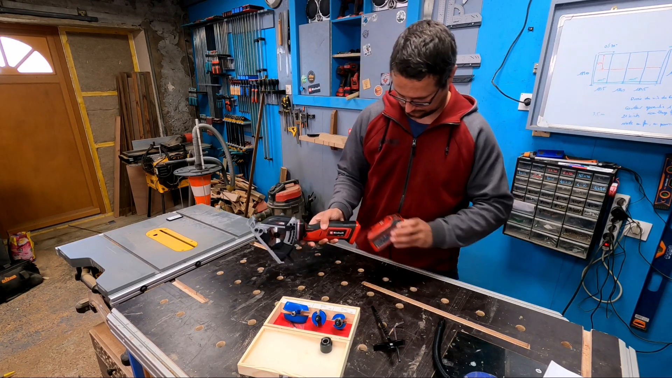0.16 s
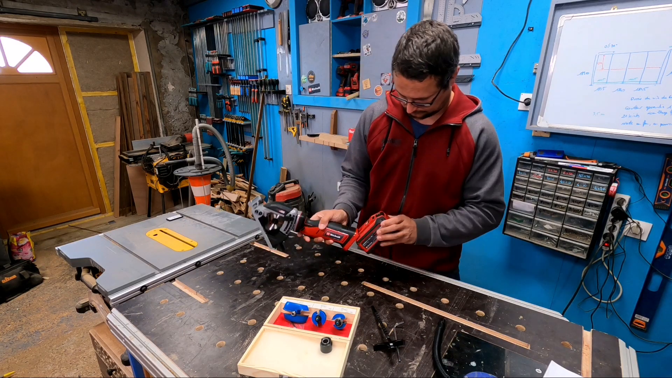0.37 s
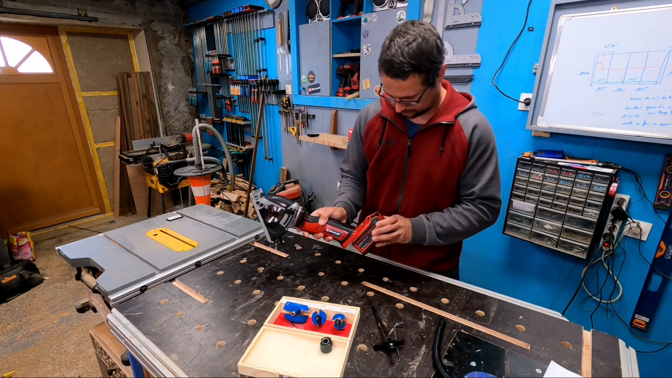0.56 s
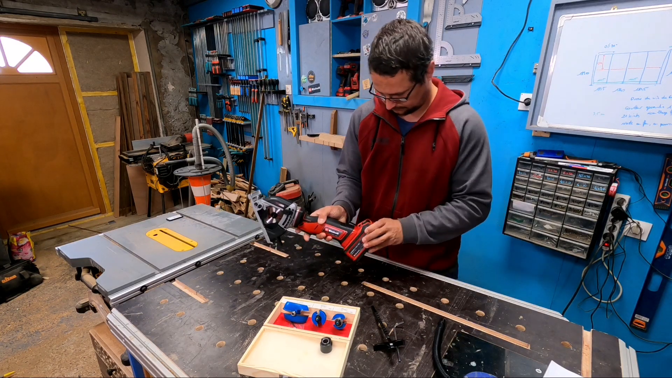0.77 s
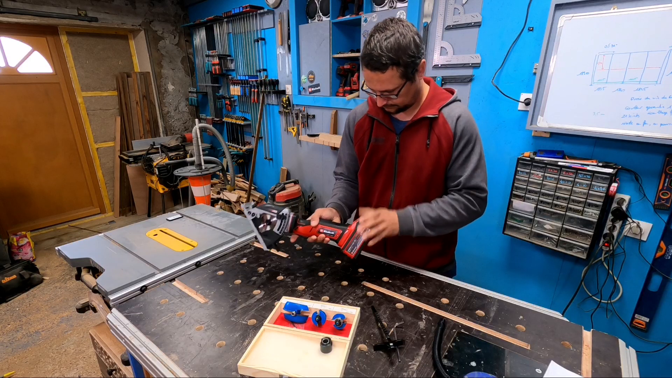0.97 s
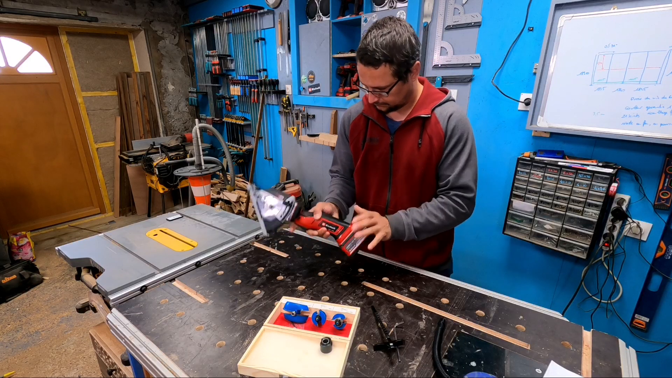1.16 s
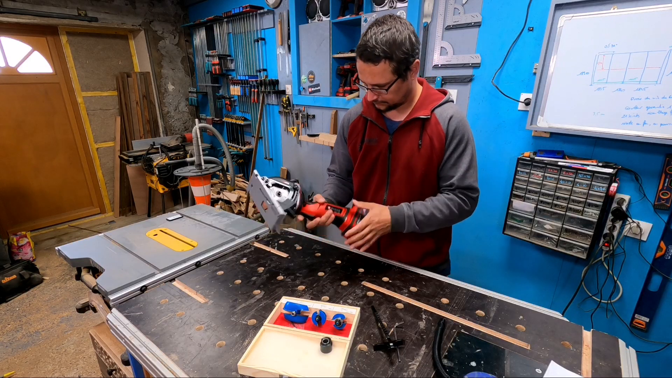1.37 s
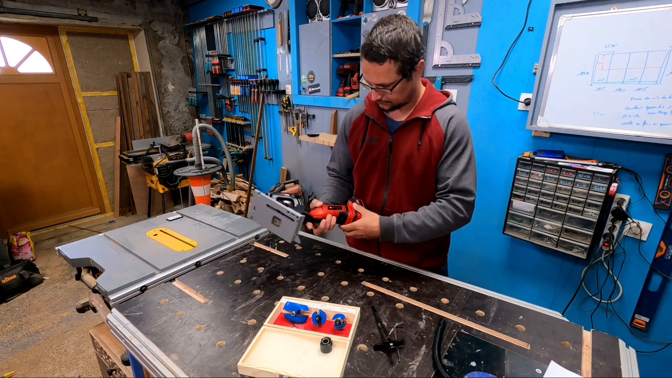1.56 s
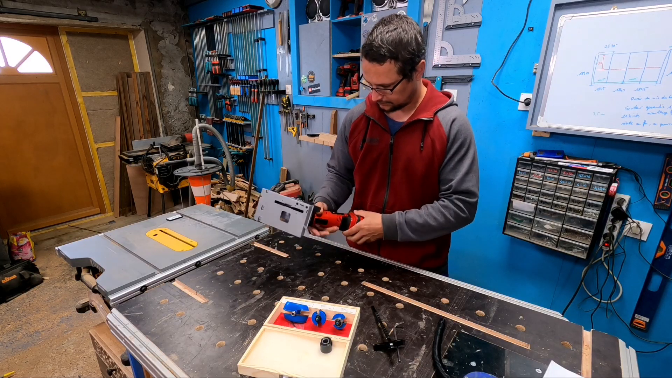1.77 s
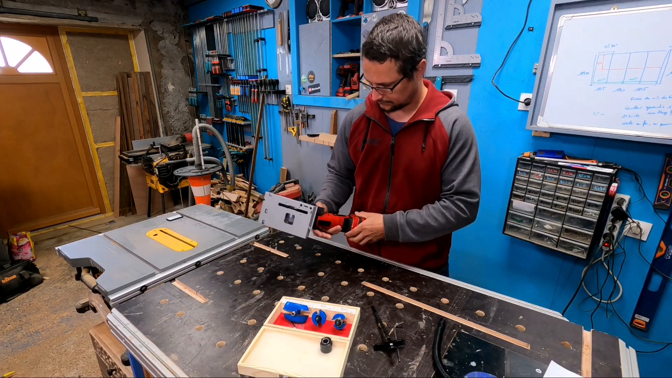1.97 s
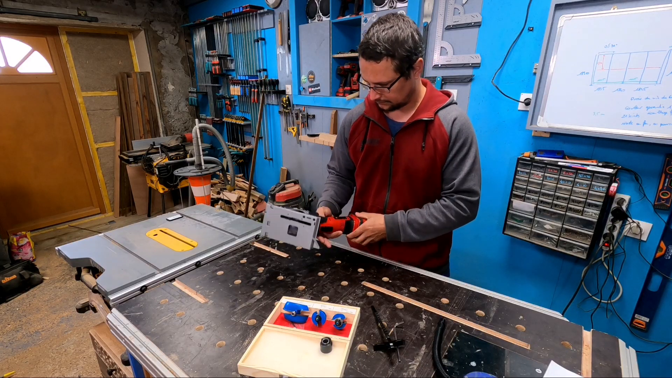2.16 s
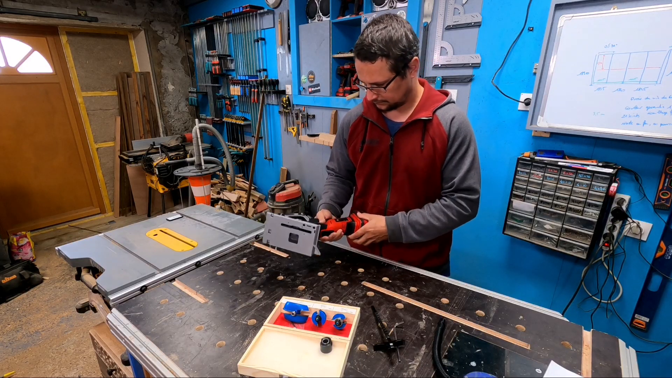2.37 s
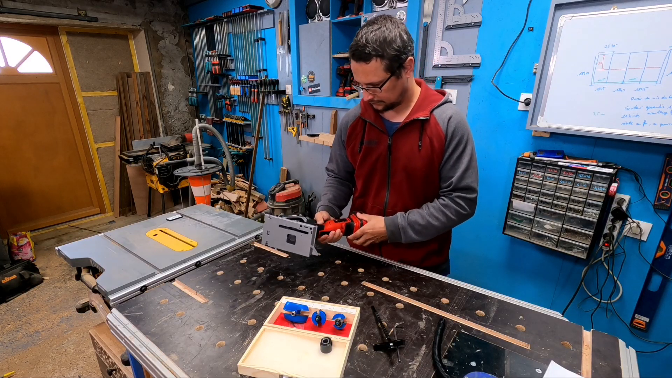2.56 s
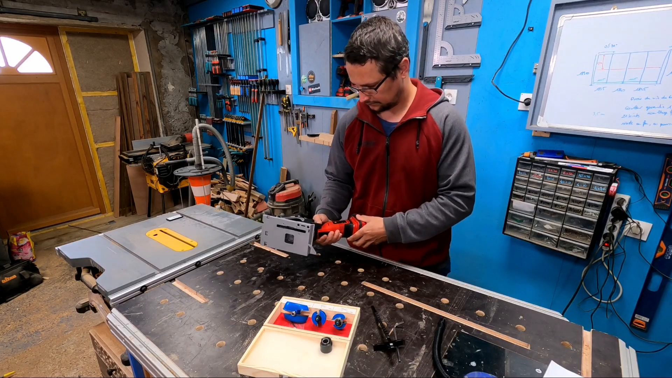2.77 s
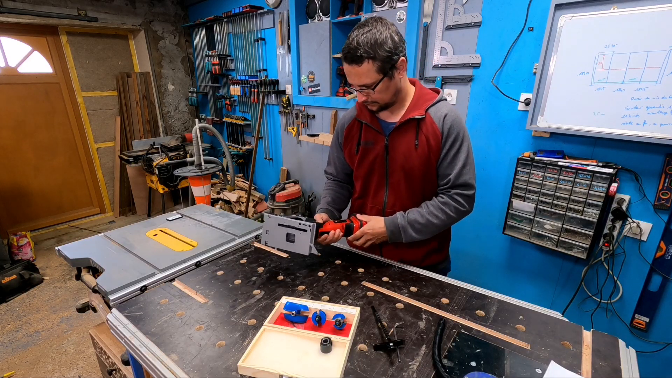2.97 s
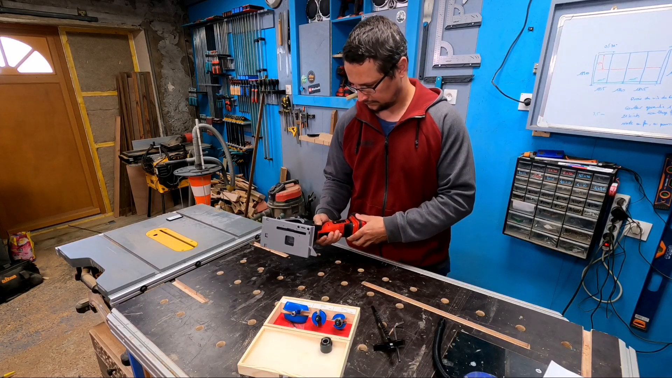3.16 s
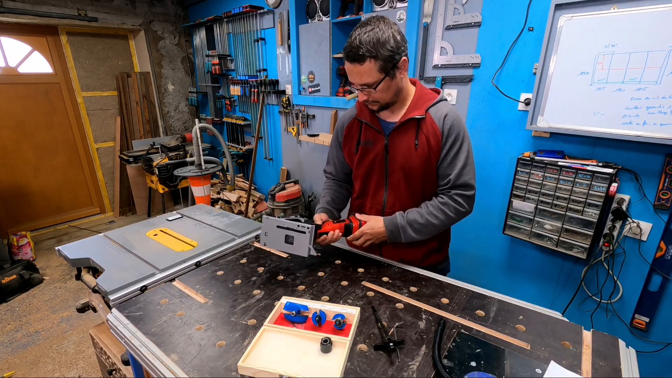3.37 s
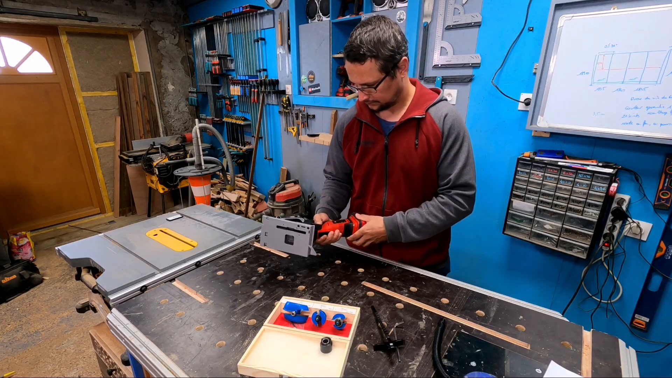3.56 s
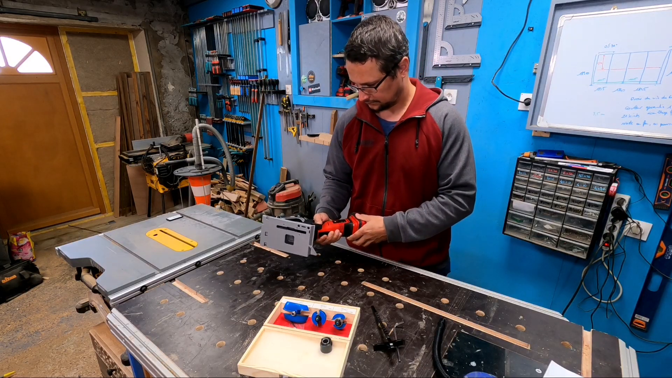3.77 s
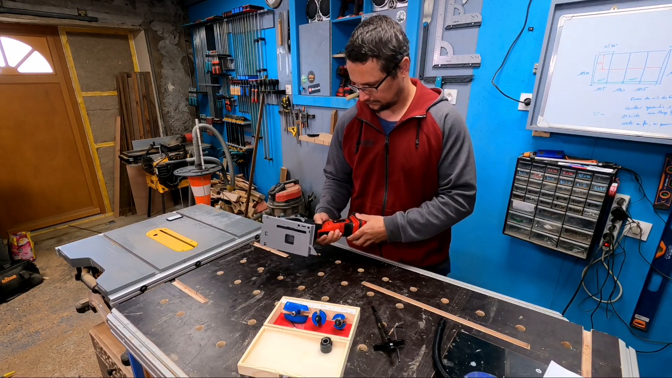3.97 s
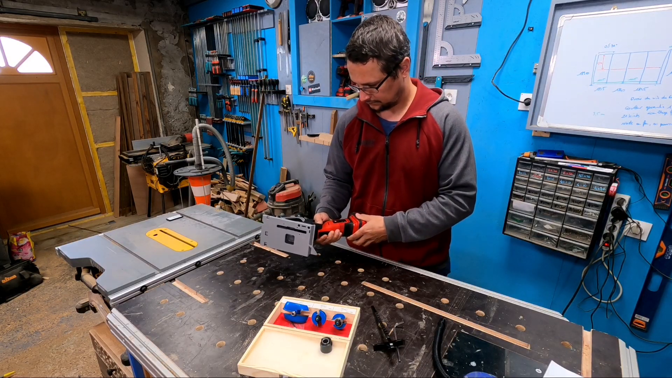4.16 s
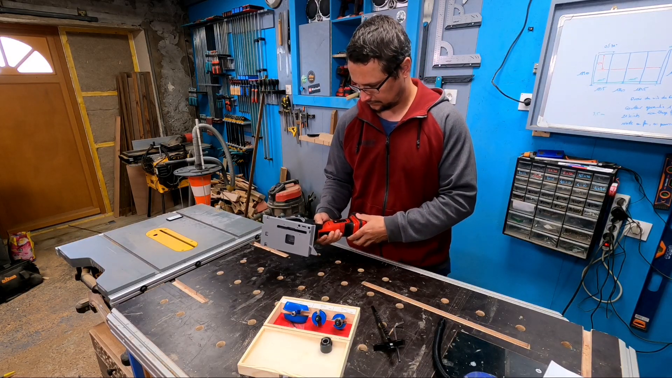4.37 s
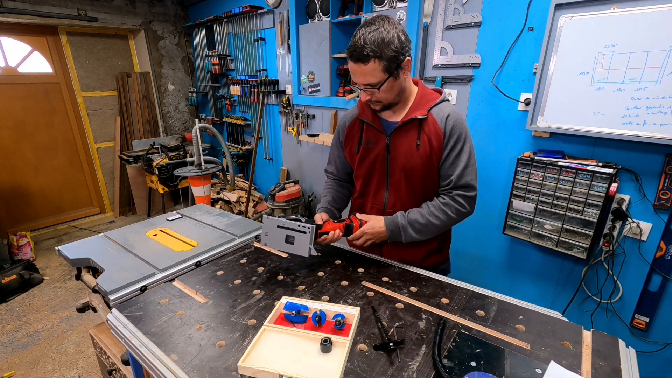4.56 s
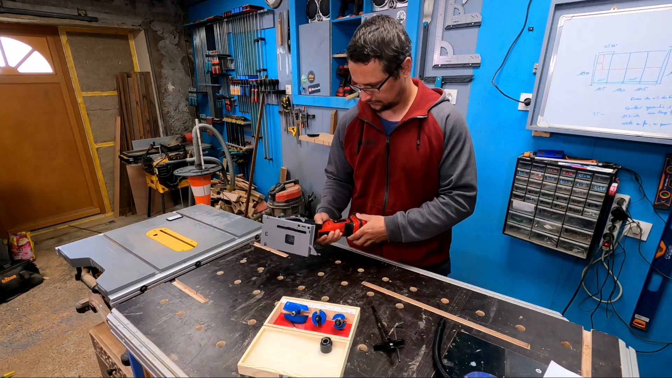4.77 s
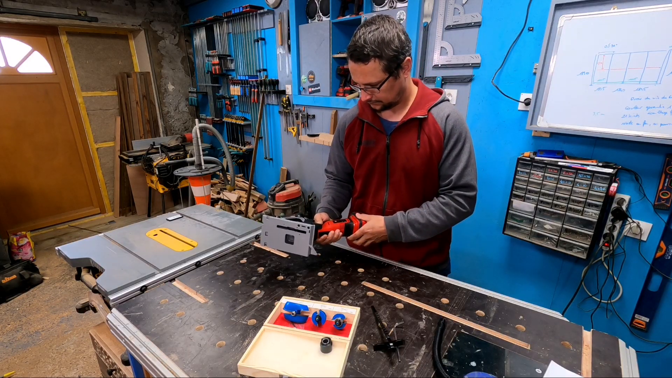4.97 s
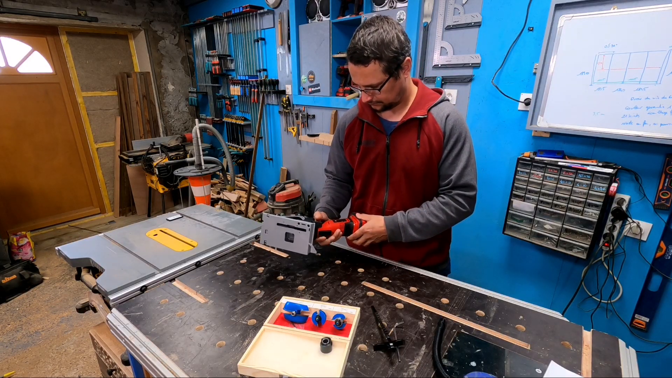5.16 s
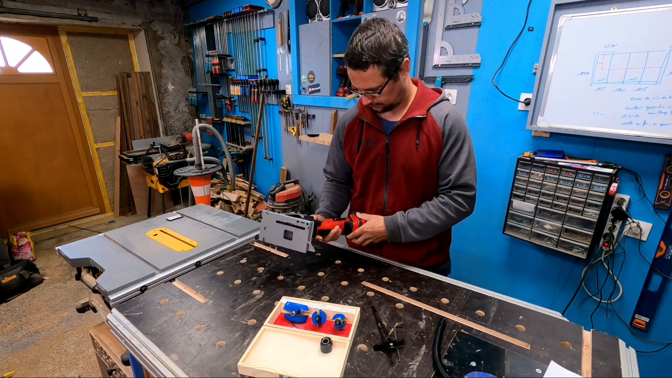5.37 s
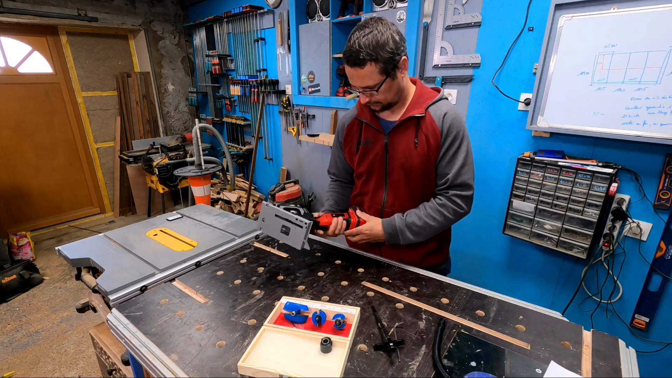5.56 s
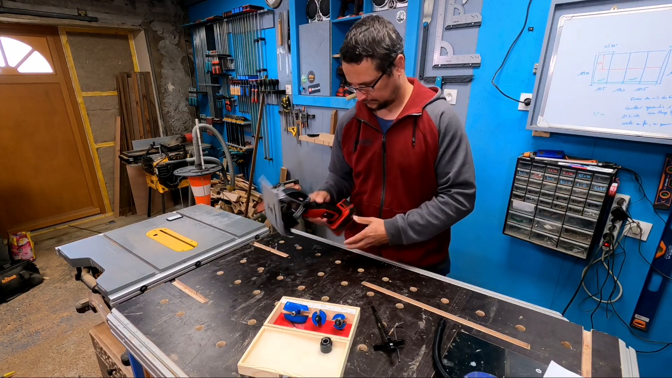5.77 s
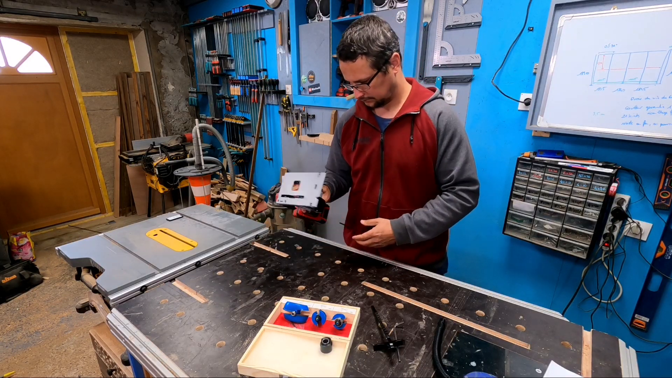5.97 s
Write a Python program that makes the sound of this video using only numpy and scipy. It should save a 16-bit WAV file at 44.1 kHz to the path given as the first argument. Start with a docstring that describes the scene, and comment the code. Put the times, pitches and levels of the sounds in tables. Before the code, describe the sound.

Close, dry plastic clicks of a battery being seated come first, ending in a loud bright latch clack with a brief rustling tail. After near silence with light cloth rustle and soft thumps, a small power tool knocks into motion, climbs in pitch for two seconds, holds a hissing, whining top speed briefly, then drops rapidly and chatters to rest. The small workshop answers with short reflections.

```python
"""In a small workshop, a battery is slid and latched onto a cordless trim router and the switch is clicked.
The brushless motor ramps up, holds its top speed and is braked: shaped noise gives fan rush and bearing rattle,
sines locked to the shaft give its tones, and cracks with a metal ring give the knocks of the slow rotor.
Plastic clicks are noise cracks with ringing shell modes; filtered, grainy noise gives rustle and a latch's tail.
Low bumps and soft thumps are short sines, over a quiet noise floor; bench and walls answer with decaying noise."""
import sys
import numpy as np
from scipy import signal
from scipy.fft import rfft, irfft, next_fast_len
from scipy.io import wavfile
from scipy.ndimage import map_coordinates

SR = 44100
rng = np.random.default_rng(int(sys.argv[2]) if len(sys.argv) > 2 else 0)


def file_out(sig):
    """Save sig as 16-bit WAV at sys.argv[1]."""
    # one column per channel
    cols = np.atleast_2d(sig).T
    # limit, then scale
    lim = np.clip(cols, -1, 1)
    pcm = np.round(lim * 32767).astype(np.int16)
    wavfile.write(sys.argv[1], SR, pcm)


N = 265834
TIME = np.arange(N) / SR
TOP_HZ = 14700  # upper band limit of the whole sound


def amp(db):
    """Decibels to gain."""
    return 10 ** (np.asarray(db) / 20)


def unit(x):
    """Scale to rms 1."""
    return x / np.sqrt(np.mean(x ** 2) + 1e-20)


def along(points, hz):
    """Read (f/Hz, value) points on a log frequency axis."""
    f, v = np.transpose(points)
    return np.interp(np.log(hz + 1), np.log(f + 1), v)


def wobble(rate):
    """A smooth random curve with rate knots a second."""
    knots = rng.standard_normal(int(N * rate / SR) + 4)
    return map_coordinates(knots, [TIME * rate])


def filtered(x, response):
    """Filter x by a response given as a function of frequency."""
    m = next_fast_len(N + SR // 2)
    return irfft(rfft(x, m) * response(np.fft.rfftfreq(m, 1 / SR)), m)[..., :N]


def coloured(x, spectrum):
    """Shape x with a (f/Hz, level/dB) spectrum, at rms 1."""
    return unit(filtered(x, lambda hz: amp(along(spectrum, hz))))


def causal(gain, size=4096):
    """Minimum-phase impulse response of energy 1: a sharp front with the given gain over frequency."""
    cepstrum = irfft(np.log(np.maximum(gain(np.fft.rfftfreq(size, 1 / SR)), 1e-6)))
    cepstrum[1:size // 2] *= 2
    cepstrum[size // 2 + 1:] = 0
    h = irfft(np.exp(rfft(cepstrum)))
    return h / np.linalg.norm(h)


def add(track, s, sound):
    """Mix a sound into the track at time s."""
    part = track[max(round(s * SR), 0):][:len(sound)]
    part += sound[:len(part)]


# speeds in turns per second
START_S, RAMP_HZ_PER_S, TOP_SPEED_HZ = 2.585, 191, 378.4
CREEP_HZ_PER_S, SETTLE_HZ = 4.4, 5  # the governor eases into top speed and creeps up a little
LAG_HZ, CAUGHT_UP_S, CATCH_S = 7.5, 3.3, .04  # the rotor trails the ramp at first, then catches up
BRAKE_S, BRAKE_HZ_PER_S, BRAKE_FADES_HZ = 5.25, 590, 112  # the brake loses its grip at low speed


def shaft_speed():
    """Turns per second: a straight ramp, a governed top speed, then even braking that eases off near rest."""
    governed = TOP_SPEED_HZ + CREEP_HZ_PER_S * (TIME - BRAKE_S)
    rising = RAMP_HZ_PER_S * (TIME - START_S)
    ramp = -SETTLE_HZ * np.logaddexp(-rising / SETTLE_HZ, -governed / SETTLE_HZ)  # a soft minimum
    lag = LAG_HZ / (1 + np.exp((TIME - CAUGHT_UP_S) / CATCH_S))
    braked = TOP_SPEED_HZ - BRAKE_HZ_PER_S * (TIME - BRAKE_S)
    easing = BRAKE_FADES_HZ * np.exp(np.minimum(braked / BRAKE_FADES_HZ - 1, 0))
    return np.clip(ramp - lag, 0, np.maximum(braked, easing))


# resonances of the motor body: (f/Hz, width/Hz, level/dB before the common ring level)
BODY_RESONANCES = [(306, 48, 4), (534, 76, -4), (690, 33, 0.5), (930, 60, 5), (1492, 100, 0),
                   (1671, 105, 2), (2047, 90, 2.5), (2240, 160, 6.5), (2680, 145, 0.5), (3130, 180, 1.5),
                   (3633, 39, -12), (3773, 93, -4), (5600, 600, -2), (6880, 380, -3), (7760, 350, -2),
                   (9730, 530, -5.5)]
# broad slope of the motor body, relative: (f/Hz, level/dB per Hz)
BODY_SLOPE = [(100, -53), (150, -35), (200, -34.5), (310, -29.5), (420, -26), (560, -21.5), (700, -16),
              (810, -21), (1000, -10.5), (1400, -5.5), (1900, -9), (2520, -8), (2900, -4.5), (3700, -3),
              (4700, -13.5), (7700, -15.5), (9000, -21), (12300, -26), (15000, -45.5)]


def housing(hz, ring_db=-1, low_cut_hz=138):
    """Gain of the motor body: a broad slope with resonances standing on it, and no bass."""
    peaks = sum(amp(db) / (1 + ((hz - f) / (width / 2)) ** 2) for f, width, db in BODY_RESONANCES)
    bass = 1 / np.sqrt(1 + (low_cut_hz / (hz + 1)) ** 16)
    return amp(along(BODY_SLOPE, hz)) * (1 + amp(ring_db) * peaks) * bass


def noise_db(law, speed, unload_s=0.43, unsteady_db=.5):
    """Level of one motor noise from the shaft speed; it drops as the brake takes the drive away."""
    knee_db, knee_hz, below_db, above_db, braked_db = law
    octaves = np.log2((speed + 1) / knee_hz)
    above = np.logaddexp(0, 5 * octaves) / 5  # a rounded knee
    braked = np.clip((TIME - BRAKE_S) / unload_s, 0, 1)
    by_speed = knee_db + below_db * (octaves - above) + above_db * above
    return by_speed + braked_db * braked + unsteady_db * wobble(12)


WHIRR_DB, WHIRR_WAVER = -8, .55  # level against the random air; phase waver in radians


def whirr(turns, speed, count=30):
    """The rotor stirs the air alike on every turn: a comb of wavering upper harmonics."""
    comb = np.zeros(N)
    for k in range(5, count):
        comb += np.sin(2 * np.pi * (k * turns + rng.random()) + WHIRR_WAVER * wobble(40))
    return comb * 2 * np.sqrt(speed / SR)  # as strong per Hz as white noise


def ticking(turns, speed, scatter=.05, spread_db=2.5, second_db=-4, t60=.02, weak_below_hz=90):
    """The bearings tick twice a turn, strong then weak; each tick is a short burst of ball chatter."""
    half_turns = np.arange(1, int(2 * turns[-1]))
    chance = rng.standard_normal((len(half_turns), 2))
    at = np.searchsorted(turns, half_turns / 2 + scatter * chance[:, 0]).clip(0, N - 1)
    strength = unit(amp(spread_db * chance[:, 1] + second_db * (half_turns % 2)))
    energy = strength ** 2 * SR / (2 * speed[at] + weak_below_hz)
    fade = amp(-60 * np.arange(SR // 50) / SR / t60) ** 2
    power = signal.fftconvolve(np.bincount(at, energy, N), fade / fade.sum())[:N]
    return rng.standard_normal(N) * np.sqrt(np.abs(power))


# how fan rush (low band), bearing rattle (middle band) and air hiss (high band) grow with speed, each:
# (level/dB at the knee, knee/turns per s, slope below/dB per octave, slope above/dB per octave,
# change under braking/dB)
FAN_LAW = (-30, 175, 7.5, -.5, -3.5)
RATTLE_LAW = (-25.5, 126, 7.5, -1.2, -5.5)
HISS_LAW = (-32.5, 159, 9, -0.46, -2.5)
ROTOR_FREE_S = 2.695  # fan and bearings are heard from here on


def motor_noise(turns, speed, grit_db=-7.5, slow_hz=260):
    """Fan air and rotor whirr sound through the body; the bearings tick, most clearly at low speed."""
    fan_db, rattle_db, hiss_db = [noise_db(law, speed) for law in (FAN_LAW, RATTLE_LAW, HISS_LAW)]
    air = rng.standard_normal(N) + amp(WHIRR_DB) * whirr(turns, speed)
    share = amp(grit_db) * 2 / (1 + speed / slow_hz)
    drive = (air + share * ticking(turns, speed)) / np.sqrt(1 + share ** 2)

    def low(hz):
        return 1 / np.sqrt(1 + (hz / 1400) ** 8)

    def high(hz):
        return 1 - 1 / np.sqrt(1 + (hz / 4700) ** 12)

    def middle(hz):
        return 1 - low(hz) - high(hz)

    def part(band):
        return unit(filtered(drive, lambda hz: housing(hz) * band(hz)))

    sound = amp(fan_db) * part(low) + amp(rattle_db) * part(middle) + amp(hiss_db) * part(high)
    return sound * np.clip((TIME - ROTOR_FREE_S) / 0.04, 0, 1)


# tones of shaft, bearing and fan: (multiple of shaft speed, level/dB before radiation, phase waver/rad,
# fades below/turns per s, change under braking/dB)
SHAFT_ORDERS = [(1, -34.5, .25, 60, -3), (2, -33.5, .3, 80, -10), (2.51, -32, .6, 300, -6),
                (3, -32.5, .27, 92, -10), (4, -28, .2, 290, -8), (4.12, -32, .45, 340, -3),
                (4.52, -27, .24, 330, -3), (5, -29.5, .28, 225, -6), (6, -31, .35, 190, -6),
                (7, -32, .3, 185, -6), (7.9, -34, .5, 230, -6), (15, -25.5, .08, 330, -20)]
# how well the shell and air vents radiate a tone: (f/Hz, level/dB)
SHELL_RADIATION = [(170, -60), (250, -32), (300, -16), (378, -18), (410, -30), (490, -13), (690, -11),
                   (760, -19), (950, -13), (1180, -16), (1390, -3), (1490, 1), (1560, -1), (1710, .5),
                   (1800, -12), (1890, -9), (2100, -15), (2650, -11), (3100, -16), (5400, -22), (5640, -10)]
# common swell and sag of all the shaft tones: (t/s, level/dB)
TONE_SWELL = [(4.1, -1.5), (4.45, 0), (4.62, 2.5), (4.75, -2), (5.02, 1), (5.25, -2)]


def motor_tones(turns, speed, waver_rate=60, unload_s=.07, flutter_db=.5):
    """Shaft and bearing tones swell as they sweep through the body's resonances."""
    out = np.zeros(N)
    braked = np.clip((TIME - BRAKE_S) / unload_s, 0, 1)
    for multiple, db, waver, fades_hz, braked_db in SHAFT_ORDERS:
        angle = 2 * np.pi * multiple * turns
        tone = np.sqrt(2) * np.sin(angle + waver * wobble(waver_rate))
        radiated_db = along(SHELL_RADIATION, multiple * speed)
        level_db = db + flutter_db * wobble(24) + radiated_db + braked_db * braked
        out += amp(level_db) * tone / (1 + (fades_hz / (speed + 1)) ** 16)
    return out * amp(np.interp(TIME, *np.transpose(TONE_SWELL)))


# whine of the motor drive at the start: (f/Hz, peak level/dB)
DRIVE_TONES = [(3225, -53.5), (6430, -60), (9650, -65)]


def drive_whine():
    """The electronics whine thinly while they pull the rotor into motion: wavering steady-pitch sines."""
    level = np.interp(TIME, [2.595, 2.61, 2.78, 2.9], [0, 1, 1, 0])
    tones = sum(amp(db) * np.sin(2 * np.pi * hz * TIME + 1.2 * wobble(110)) for hz, db in DRIVE_TONES)
    return level * tones


# the rotor knocks against the body as it is started and braked:
# (t/s, peak level/dB, metal ring against the crack/dB)
ROTOR_KNOCKS = [(2.7545, -28, -10), (2.82, -28, -10), (2.845, -26.5, -8), (2.89, -21, -2),
                (2.927, -17.5, 2), (3.126, -12.5, -8), (3.146, -17, -11), (5.615, -17, 4),
                (5.622, -12.5, 0), (5.649, -16.5, 4), (5.657, -18, 6), (5.681, -20, 18), (5.698, -25, 14),
                (5.723, -14, 6), (5.732, -19, -14), (5.746, -19, -2), (5.763, -21, -10), (5.774, -16, -1),
                (5.787, -17.5, -14), (5.81, -20, -12), (5.8433, -16, -10), (5.861, -22, -14),
                (5.881, -22.5, -14), (5.902, -21.5, -20), (5.927, -28, -16), (5.932, -28, -20),
                (5.961, -28, -12), (5.969, -25.5, -21), (6.009, -26, -16)]
RING_HZ, RING_T60 = 3060, .012  # metal ring: pitch, decay in seconds


def knocks(t60=0.017, bright_db=0.5):
    """Each knock of the slow rotor is a short crack in the motor body and a metal ring."""
    out, t = np.zeros(N), np.arange(SR // 20) / SR
    body = causal(lambda hz: housing(hz) * amp(bright_db * (hz > 4500)))
    for s, db, ring_db in ROTOR_KNOCKS:
        burst = rng.standard_normal(len(t)) * amp(-60 * t / t60)
        crack = signal.fftconvolve(burst, body)[:len(t)]
        ring = np.sin(2 * np.pi * RING_HZ * t) * amp(-60 * t / RING_T60) * (1 - np.exp(-t * RING_HZ / 2))
        hit = unit(crack) + amp(ring_db) * unit(ring)
        add(out, s, amp(db) * hit / np.abs(hit).max())
    return out


# single body resonances that flare at passing speeds and as the brake bites:
# (middle t/s, time to fall to 1/e either side/s, f/Hz, width/Hz, level/dB)
BODY_FLARES = [(3.183, 0.084, 3050, 260, -28.5), (3.34, 0.057, 665, 180, -40),
               (3.876, 0.18, 3083, 220, -28), (4.55, 0.42, 1540, 220, -28.5),
               (5.283, 0.071, 3130, 260, -27.5), (5.348, 0.19, 2780, 320, -29),
               (5.382, 0.077, 1510, 110, -26), (5.34, 0.055, 1680, 70, -30), (5.49, 0.066, 690, 60, -45),
               (5.652, 0.027, 292, 35, -48)]


def flares():
    """A body resonance rings up roughly and dies away again: narrow noise under a smooth swell."""
    out = np.zeros(N)
    for s, length, hz, width, db in BODY_FLARES:
        ring = filtered(rng.standard_normal(N), lambda f: 1 / (1 + ((f - hz) / (width / 2)) ** 4))
        swell = np.exp(-((TIME - s) / length) ** 2)
        out += amp(db) * unit(swell * ring) * np.sqrt(np.mean(swell ** 2))
    return out


# plastic contacts of battery, latch, switch and rotor: (t/s, level/dB, brightest f/Hz,
# fall below it/dB per octave, fall above it/dB per octave, crack t60/s)
CONTACT_CLICKS = [(0.371, -53.5, 1800, 9, 11, 0.012), (0.384, -25.5, 1520, 3.5, 5.9, 0.0096),
                  (0.513, -44, 1490, 12, 14, 0.018), (0.539, -26.5, 2935, 4, 12, 0.012),
                  (0.5434, -31.5, 3234, 4.8, 14, .008), (0.593, -38.5, 450, 5, 6, .018),
                  (0.608, -43.5, 807, 7.4, 5.8, .014), (0.625, -39.5, 2100, 12, 22, .014),
                  (0.646, -44.5, 1606, 14, 13, .014), (0.665, -46.5, 896, 6.1, 6.3, 0.012),
                  (0.77, -34, 2200, 15.4, 21, .03), (0.785, -36, 1950, 15, 14, 0.018),
                  (0.8092, -23.5, 1350, 8.5, 13, .018), (0.827, -19.5, 3900, 9, 8, 0.0085),
                  (0.829, -25, 4300, 5.2, 6.2, 0.0082), (0.839, -20.5, 1500, 2.6, 7, .011),
                  (1.242, -59, 3500, 8, 8, .012), (1.2518, -34, 2690, 3.5, 4.1, 0.015),
                  (1.67, -56, 3210, 3.5, 3.5, 0.018), (2.156, -64, 4500, 1, 1, .014),
                  (2.173, -56, 5000, 2.7, 3, 0.015), (2.181, -40.5, 7000, 6.2, 2, 0.015),
                  (2.2162, -38, 7430, 5.8, 2, .008), (2.592, -33.5, 2830, 17, 2.4, 0.0086),
                  (2.702, -35, 1770, 10.2, 5.4, 0.04)]
# modes of the plastic shell, before random shifts: (f/Hz, level/dB, t60/s)
SHELL_MODES = [(302, -3.5, 0.16), (679, -1.5, 0.057), (973, -3.5, .09), (1150, 1, 0.04), (1380, -2, 0.025),
               (1530, 2, 0.025), (2160, 0, 0.045), (2715, 2.5, 0.045), (2990, -2.5, 0.032),
               (3430, 1.5, 0.024), (4600, -2.5, 0.017), (5680, 1, 0.022)]
# shell colour shared by all contacts, relative: (f/Hz, level/dB)
SHELL_COLOUR = [(100, -47), (155, -6), (190, 4), (290, -1.5), (420, 9.5), (750, 1.5), (1350, 7), (2200, 4),
                (3200, 5.5), (6000, 5.5), (9000, -3.5), (12500, -12.5), (15000, -30.5)]
CRACK_LOW_HZ, CRACK_HIGH_HZ = 500, 7520  # the range in which contacts differ in colour
SHELL_RING_DB = -11.5  # the ring of the shell against the crack


def clicks(rise=0.00036, detune=0.012, wet_db=-2.5, early_db=-14):
    """Each contact is a coloured crack, a short ring of the plastic shell and its own echo; mid and side."""
    mid, side, t = np.zeros(N), np.zeros(N), np.arange(SR // 8) / SR
    for s, db, bright_hz, below_db, above_db, crack_t60 in CONTACT_CLICKS:
        crack = rng.standard_normal(len(t)) * amp(-60 * t / crack_t60) * (1 - np.exp(-t / rise))
        grip = 1 + detune * rng.standard_normal()  # the changing grip shifts the modes
        ring = np.zeros(len(t))
        for hz, level, t60 in SHELL_MODES:
            ring += amp(level + rng.normal(0, 1.3) - 60 * t / t60) * np.sin(2 * np.pi * grip * hz * t)

        def colour_gain(hz):
            octaves = np.log2(np.clip(hz, CRACK_LOW_HZ, CRACK_HIGH_HZ) / bright_hz)
            fall_db = np.maximum(-below_db * octaves, above_db * octaves)
            return amp(along(SHELL_COLOUR, hz) - fall_db)

        hit = signal.fftconvolve(unit(crack) + amp(SHELL_RING_DB) * unit(ring), causal(colour_gain))
        # the level is the rms if all the energy fell within a hundredth of a second
        hit = amp(db) * np.sqrt(SR // 100) * hit / np.linalg.norm(hit)
        echo = signal.fftconvolve(hit[None], tails(early_db, early_t60=.04), axes=1)
        direct = np.pad(hit, (0, echo.shape[1] - len(hit)))
        add(mid, s, (direct + amp(wet_db) * echo[0]) / np.sqrt(1 + amp(wet_db) ** 2))
        add(side, s, echo[1])
    return mid[:N], side[:N]


# strokes of hands and sleeves, of the battery on its rails, and the latch's ringing tail near 1 kHz:
# (middle t/s, length/s, level at the middle/dB, lowest f/Hz, highest f/Hz)
NOISE_STROKES = [(-0.006, 0.16, -55.5, 150, 5000), (0.125, 0.23, -59.5, 800, 7200),
                 (0.525, 0.071, -58, 800, 6000), (0.642, 0.097, -52, 297, 5000),
                 (0.864, 0.14, -35, 149.7, 10880), (0.94, 0.09, -43.5, 735, 1300),
                 (1.073, 0.1, -64, 900, 12000), (1.456, 0.13, -64, 1388, 11060),
                 (1.622, 0.1, -70.5, 2200, 11000), (1.859, 0.15, -59, 2210, 11030),
                 (2.209, 0.095, -58.5, 300, 12100), (2.644, 0.087, -53.5, 1100, 9000)]
# colour of the rustle, relative: (f/Hz, level/dB per Hz)
CLOTH_COLOUR = [(71, -45), (120, -23.5), (190, -10.5), (241, -17.5), (396, -8), (627, -11.5), (1480, -11.5),
                (4780, -12.5), (11500, -27), (14000, -51)]


def rubbing(grain_db=3, catch_db=0.7, edge_db=9):
    """Sleeves, sliding plastic and the latch's tail: bands of grainy noise, each swelling and fading."""
    grains = amp(grain_db * wobble(320) + catch_db * wobble(84))  # the rubbing catches and lets go
    rustle = coloured(rng.standard_normal(N) * grains, CLOTH_COLOUR)
    out = np.zeros(N)
    for s, length, db, low_hz, high_hz in NOISE_STROKES:
        low_cut = signal.butter(5, low_hz, "highpass", fs=SR, output="sos")
        high_cut = signal.butter(2, min(high_hz, TOP_HZ), fs=SR, output="sos")
        stroke = signal.sosfilt([*low_cut, *high_cut], rustle)
        out += amp(db - edge_db * (2 * (TIME - s) / length) ** 2) * unit(stroke)
    return out


# low bumps from handling, and the low thud of the first plastic click:
# (middle t/s, time to fall 5.8 dB either side/s, f/Hz, peak level/dB)
LOW_BUMPS = [(0.022, 0.12, 210, -60), (0.14, 0.075, 182.6, -62.5), (0.363, 0.057, 28.2, -56),
             (0.404, 0.016, 288, -42.5), (1.173, .06, 27.4, -65.5), (1.282, 0.015, 39.7, -54.5)]


def bumps():
    """Short low swells of handling and of a click's thud: sines of wavering phase."""
    out = np.zeros(N)
    for s, length, hz, db in LOW_BUMPS:
        swell = amp(db - 5.8 * ((TIME - s) / length) ** 2)
        out += swell * np.sin(2 * np.pi * hz * TIME + wobble(hz / 4))
    return out


# soft thumps at the microphone: (t/s, starting level of the fade/dB before the left and right gains)
MIC_THUMPS = [(1.039, -39), (1.999, -36), (2.538, -30.5), (3.053, -46.5), (3.238, -40), (4.936, -40)]


def thumps(fall=0.403, front=0.00028, t60=0.064):
    """Soft thumps at the microphone, each a swing whose pitch drops quickly."""
    out, t = np.zeros(N), np.arange(SR // 8) / SR
    for s, db in MIC_THUMPS:
        swing = np.sin(2 * np.pi * fall * np.log1p(t / front))
        add(out, s, -amp(db - 60 * t / t60) * swing)
    return out


# colour of the quiet floor, relative: (f/Hz, level/dB per Hz)
FLOOR_COLOUR = [(25, -1), (45, -14), (70, -18), (114, -30), (139, -3.5), (265, -8), (361, -21.5),
                (395, -12.5), (431, -15), (7000, -24), (14000, -37.5)]


def quiet_floor():
    """A faint steady noise under everything, shaped by its spectrum."""
    return amp(-73.5) * coloured(rng.standard_normal(N), FLOOR_COLOUR)


# decay of the workshop's tail: (f/Hz, t60/s)
ROOM_DECAY = [(150, 0.12), (600, 0.27), (1000, 0.36), (2000, .29), (4000, 0.25), (12000, 0.21)]


def tails(early_db, early_t60):
    """A fresh mid and side answer of the room: early bounces off the bench and a short tail."""
    hz, t, z = signal.stft(rng.standard_normal((2, SR // 2)), SR, nperseg=256)
    decay = amp(-60 * t / along(ROOM_DECAY, hz)[:, None]) + amp(early_db - 60 * t / early_t60)
    tail = signal.istft(z * decay, SR, nperseg=256)[1]
    return np.pad(tail / np.linalg.norm(tail[0]), ((0, 0), (SR // 400, 0)))  # starts 2.5 ms late


def workshop(x, wet_db, early_db=-4, early_t60=0.049, drift=2.402):
    """Bench and walls answer a lasting sound; drift in radians per second turns the echo pattern."""
    here, there = [signal.fftconvolve(x[None], tails(early_db, early_t60), axes=1)[:, :N] for _ in range(2)]
    # the tool moves in the hands, so the echo pattern slowly changes
    mid, side = here * np.cos(drift * TIME) + there * np.sin(drift * TIME)
    return ports((x + amp(wet_db) * mid) / np.sqrt(1 + amp(wet_db) ** 2), side)


# stereo width: (f/Hz, side level/dB)
SIDE_WIDTH = [(100, -10.5), (500, -13), (1500, -12.5), (3000, -9), (8000, -16), (13000, -9.5)]


def ports(mid, side, left_lag=.000012):
    """Left and right at the microphone: side level varies with frequency, and left lags by microseconds."""
    side = filtered(side, lambda f: amp(along(SIDE_WIDTH, f)))
    left = filtered(mid + side, lambda f: np.exp(-2j * np.pi * f * left_lag))
    return np.array([left, mid - side])


def scene():
    """The router and its handling in the room, over a quiet floor."""
    speed = shaft_speed()
    turns = np.cumsum(speed) / SR
    motor = workshop(motor_noise(turns, speed) + knocks() + flares(), wet_db=-7.0)
    tones = workshop(motor_tones(turns, speed) + drive_whine(), wet_db=-14)
    handling = ports(*clicks()) + workshop(rubbing(), wet_db=-8)
    floor = workshop(quiet_floor(), wet_db=-8.0)
    # bumps sit in the centre, thumps lean to the right
    return motor + tones + handling + floor + bumps() + thumps() * amp([[-4], [3]])


def record(dry):
    """The microphone keeps nothing above its band limit."""
    return filtered(dry, lambda hz: hz < TOP_HZ)


dry = scene()
out = record(dry)
file_out(out)
```